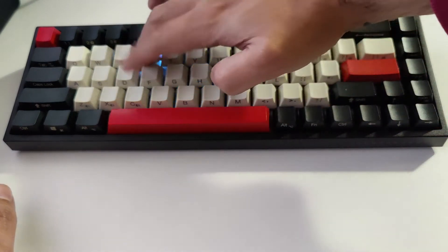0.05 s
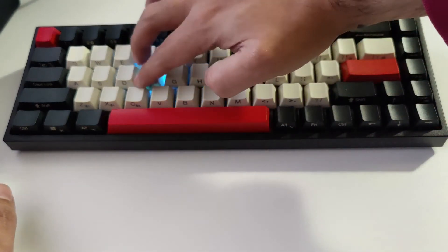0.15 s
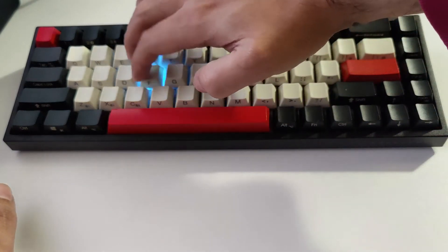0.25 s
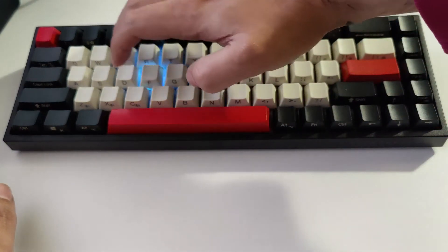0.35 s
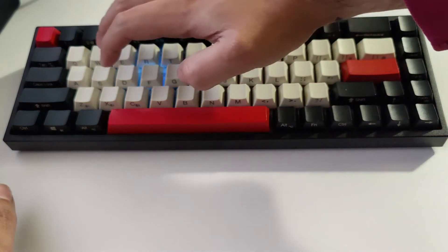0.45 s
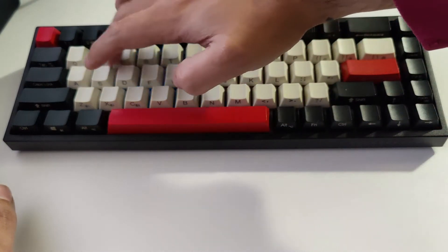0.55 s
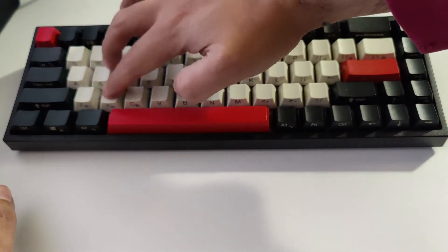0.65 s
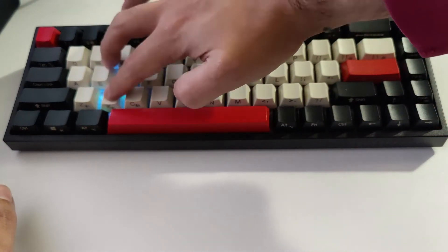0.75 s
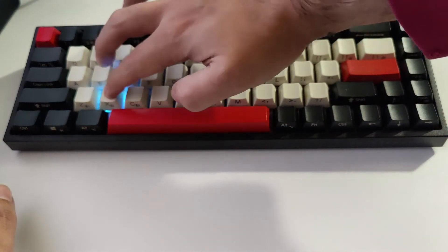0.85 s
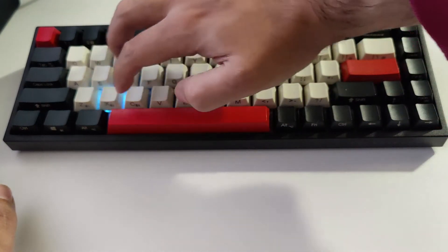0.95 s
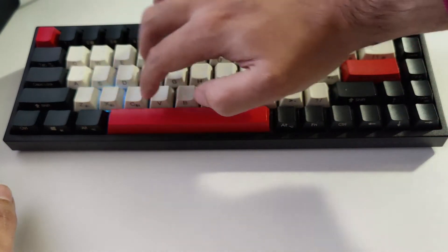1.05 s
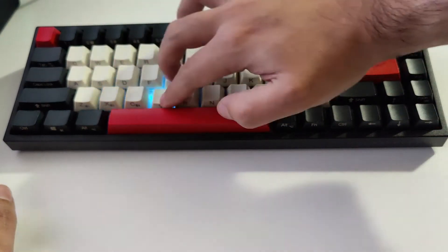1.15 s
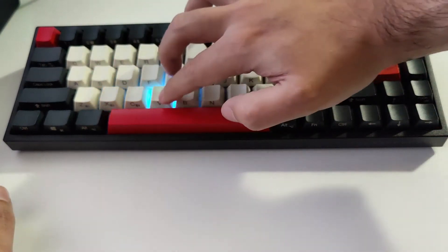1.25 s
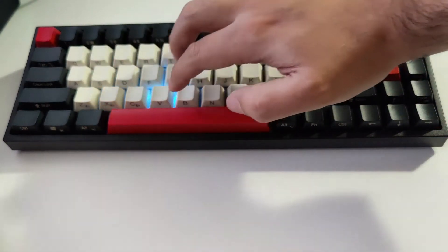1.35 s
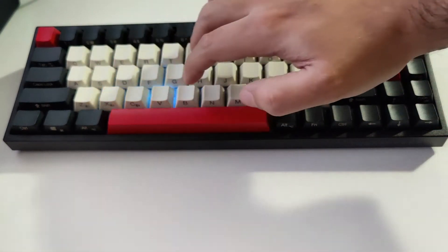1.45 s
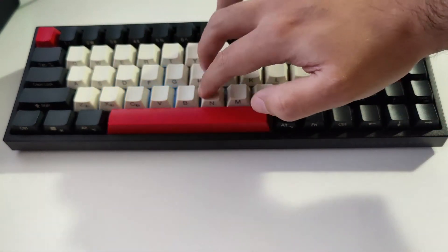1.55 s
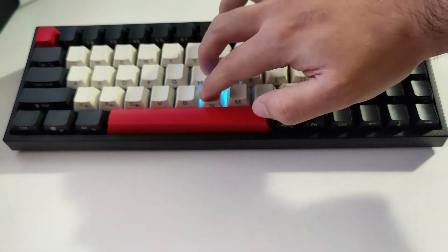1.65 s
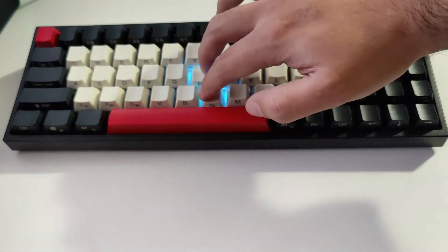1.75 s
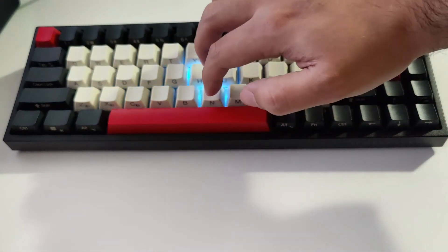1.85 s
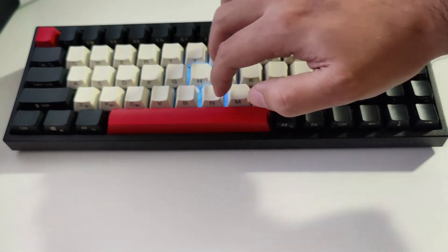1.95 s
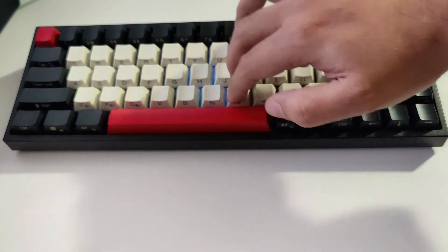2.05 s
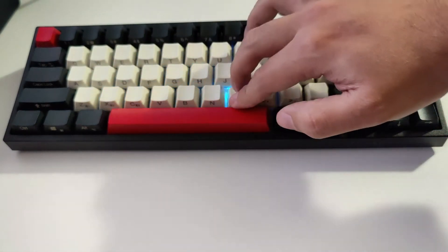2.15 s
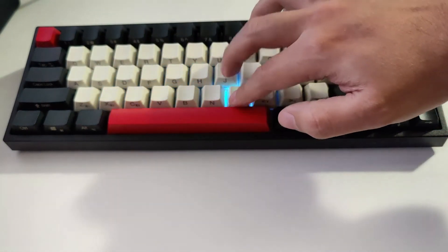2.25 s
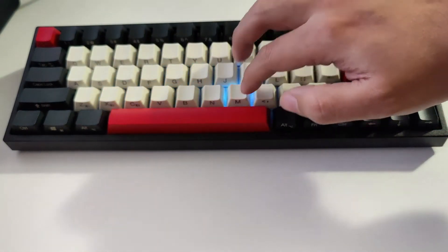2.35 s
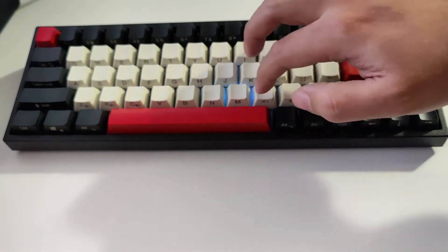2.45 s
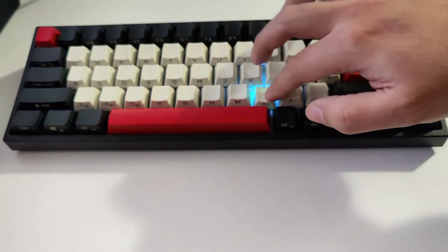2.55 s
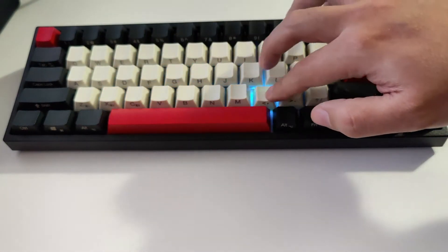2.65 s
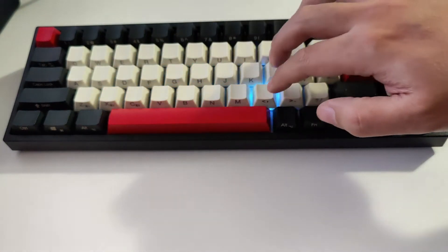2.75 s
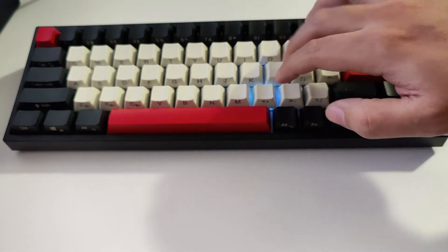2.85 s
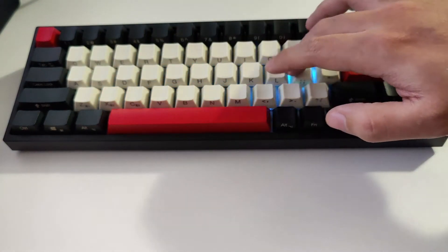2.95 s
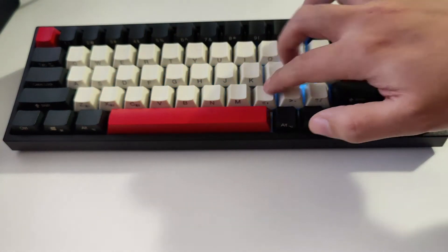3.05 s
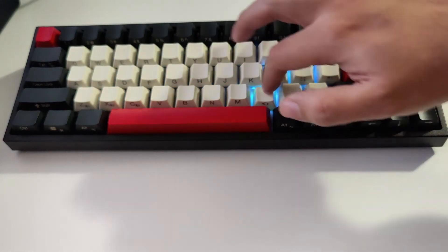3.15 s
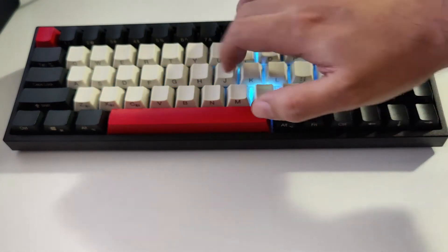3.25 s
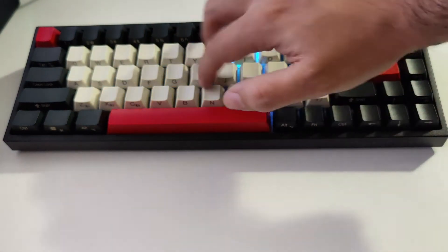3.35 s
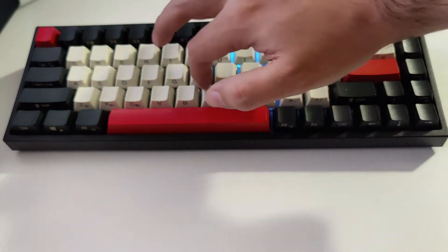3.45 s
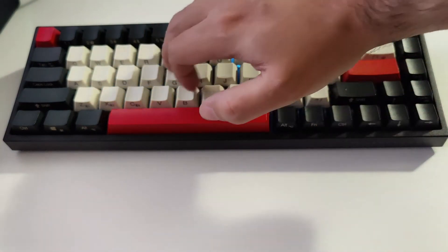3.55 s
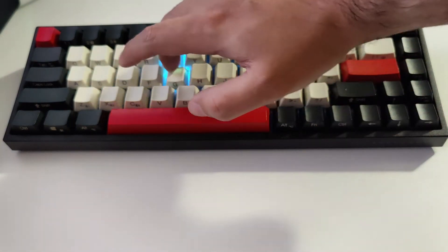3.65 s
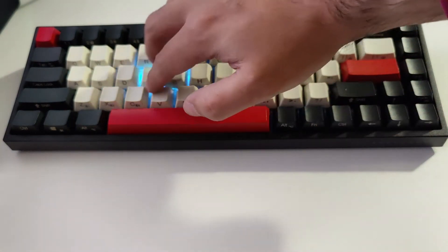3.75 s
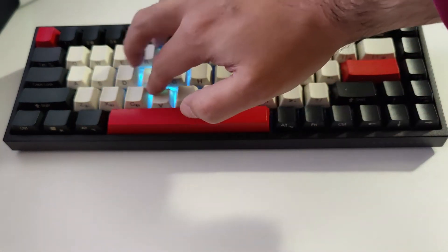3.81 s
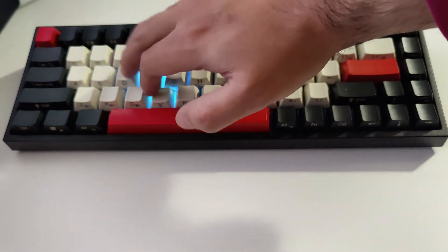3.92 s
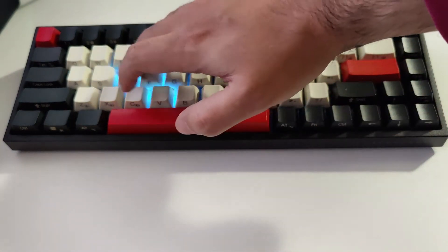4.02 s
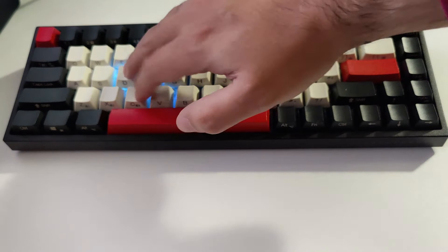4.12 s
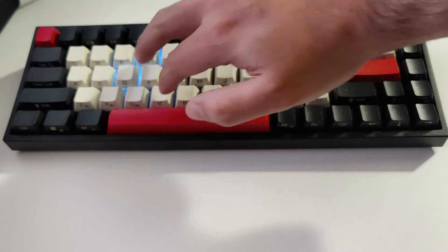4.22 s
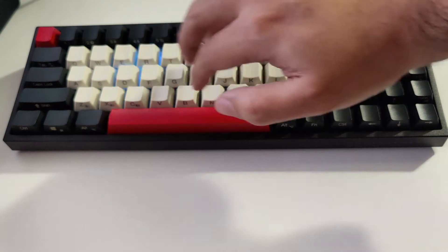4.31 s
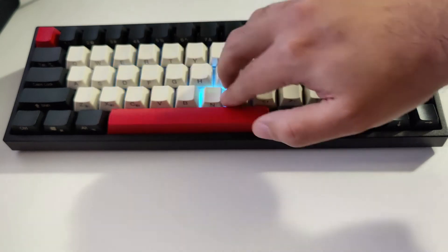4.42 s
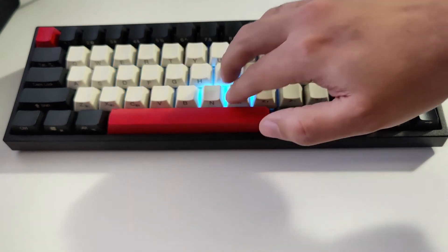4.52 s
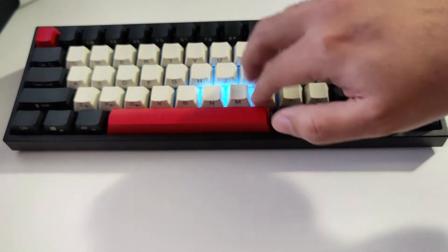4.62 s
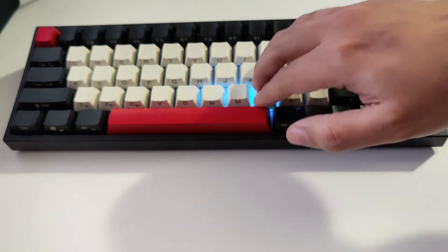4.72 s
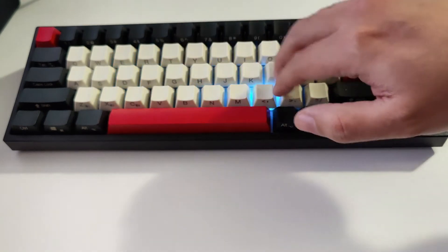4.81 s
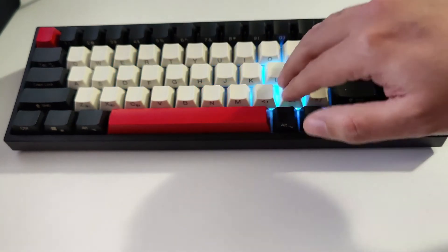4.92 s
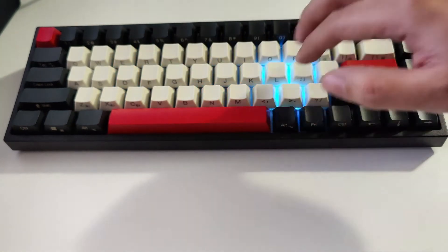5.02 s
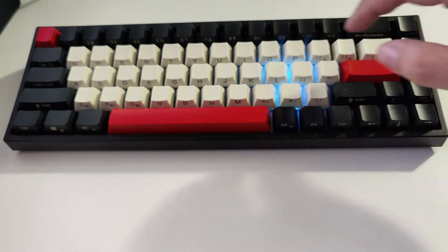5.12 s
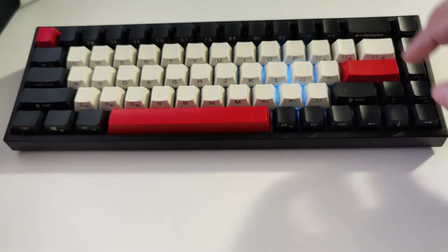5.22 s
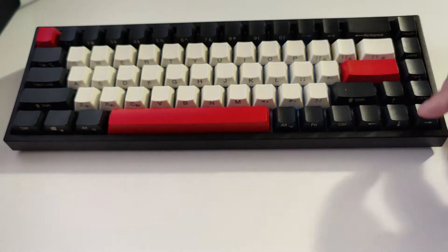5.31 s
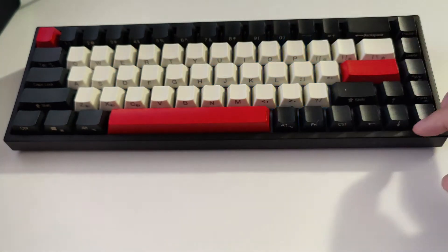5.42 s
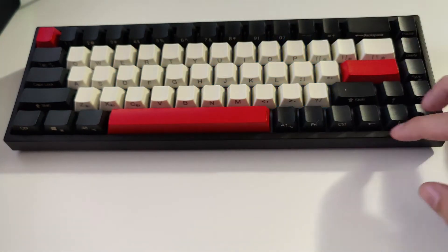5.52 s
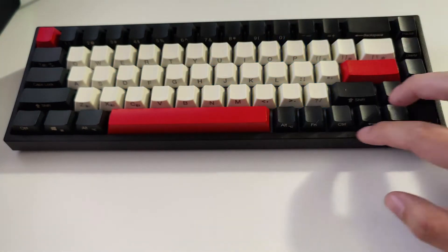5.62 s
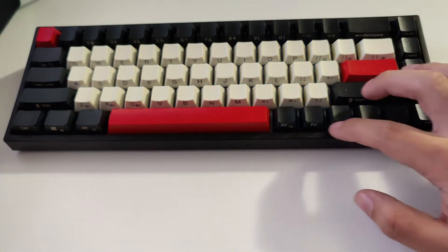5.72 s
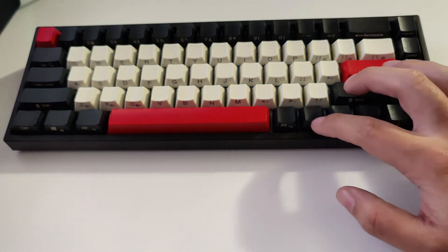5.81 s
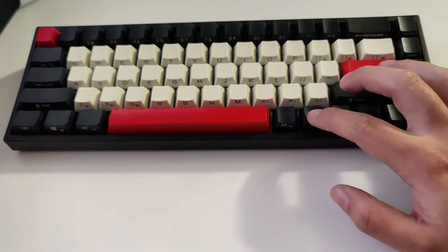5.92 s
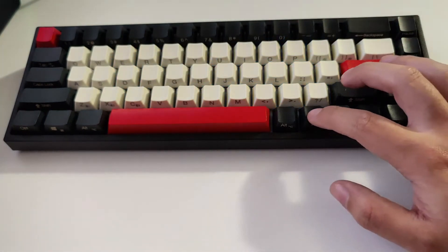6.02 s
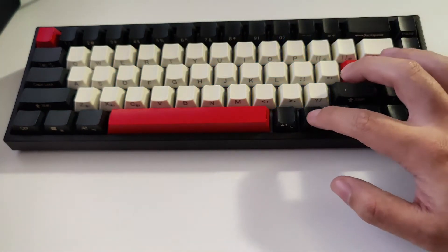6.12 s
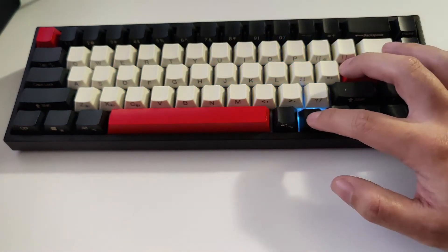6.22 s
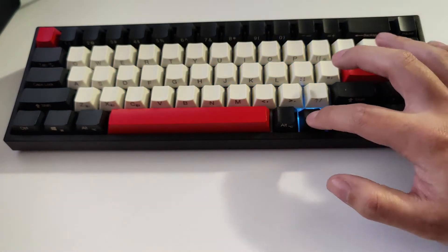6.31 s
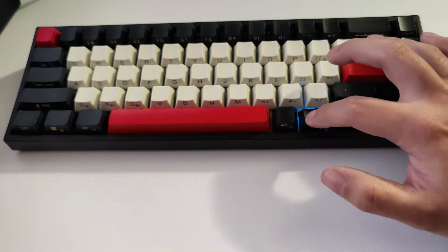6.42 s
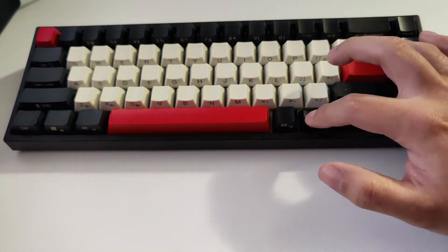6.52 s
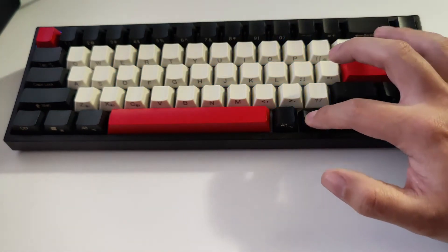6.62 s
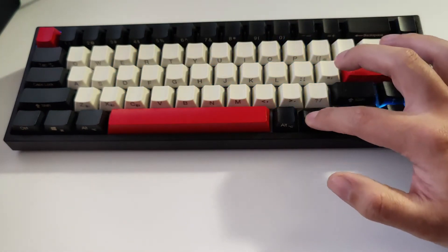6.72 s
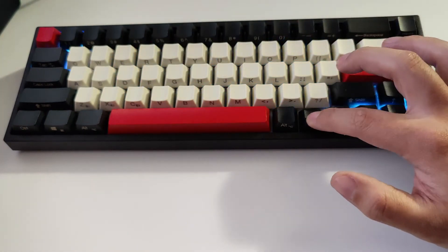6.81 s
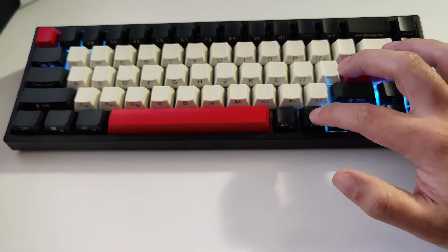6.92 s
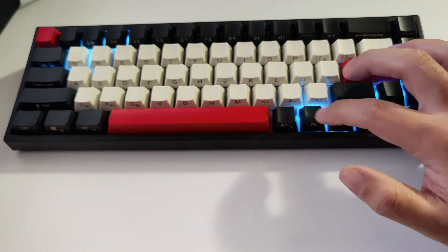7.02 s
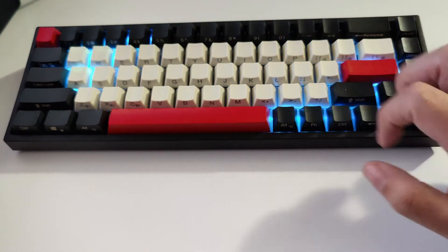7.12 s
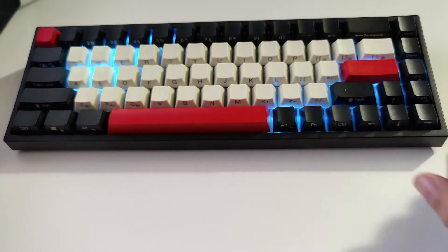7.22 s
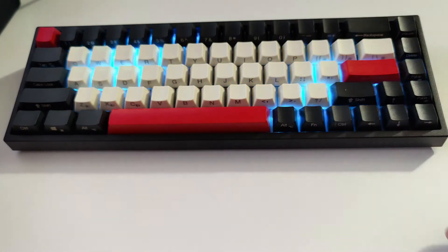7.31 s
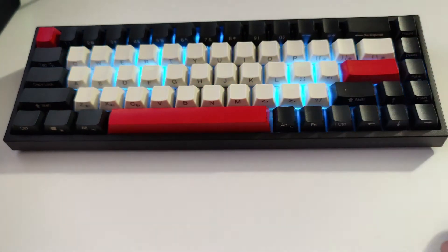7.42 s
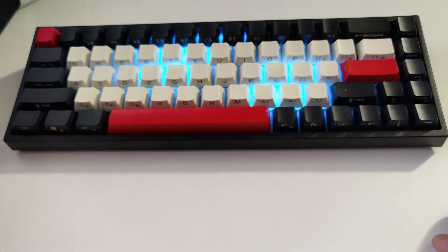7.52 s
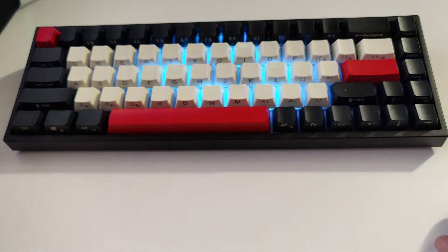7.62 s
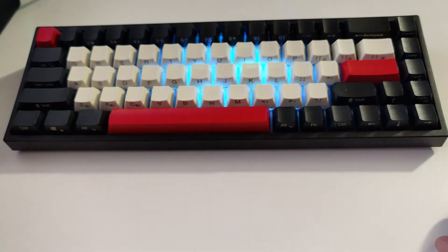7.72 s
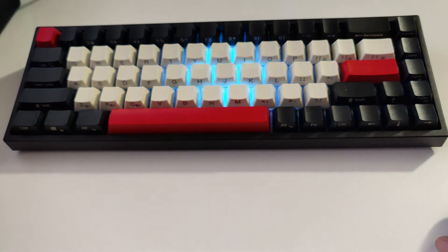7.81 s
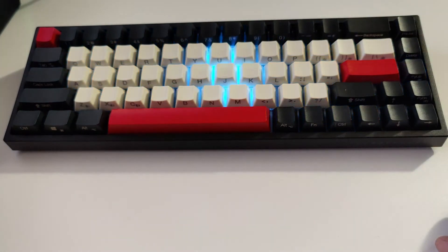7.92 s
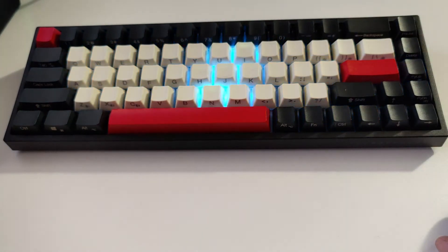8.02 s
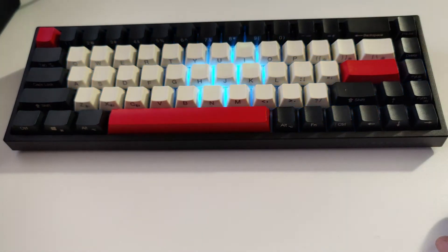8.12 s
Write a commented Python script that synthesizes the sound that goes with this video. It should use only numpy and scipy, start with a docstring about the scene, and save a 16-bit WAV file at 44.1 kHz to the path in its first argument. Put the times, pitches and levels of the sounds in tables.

```python
"""Under steady room air and a faint, swelling fan hum, a hand taps a clicky keyboard on a desk.
Strokes are made of finger touches, switch snaps, bottom hits, some resets, and springing back.
Struck plastic modes make the keys, low damped modes the thumps of the desk, filtered noise the rubs.
The hand starts at the left, goes to the middle and back, then ends a little right of the middle.
At five seconds a hard release leaves a spring pinging; late strokes are sparse; an arm drags off the desk."""
import sys
import numpy as np
from scipy import signal
from scipy.fft import rfft, irfft
from scipy.io import wavfile
from scipy.ndimage import uniform_filter1d, map_coordinates

SR = 44100
rng = np.random.default_rng(int(sys.argv[2]) if len(sys.argv) > 2 else 0)


def wav_out(sig):
    """Save sig, one row per channel (or a flat mono array), as 16-bit PCM at SR to the path in sys.argv[1]."""
    wavfile.write(sys.argv[1], SR, np.round(np.clip(np.atleast_2d(sig).T, -1, 1) * 32767).astype(np.int16))


N = 359856  # samples

# a finger lands on a cap or nudges a neighbour: [t/s, blow level/dB, keycap over case/dB]
TOUCHES = [(.089, -43.5, 7), (0.1956, -24.5, -2.5), (0.6822, -35.5, 1.5), (.771, -30.5, 6),
           (1.2128, -25, 12), (1.226, -30, -20), (1.312, -38.5, 10), (1.666, -34.5, 1), (1.809, -34, 3.5),
           (2.165, -36, -2), (2.177, -36.5, -5.5), (2.3195, -39.5, -2.5), (2.645, -29, 2),
           (2.992, -24.5, -3.5), (3.1433, -37.5, -5), (3.4316, -41.5, -4), (3.598, -35, 0),
           (3.6373, -29.5, 1), (3.6725, -37, -7), (3.8401, -26, 0.5), (4.01, -20.5, 3.5),
           (4.5017, -29, -13), (4.5076, -29.5, 2), (4.74, -27.5, 4), (4.82, -32, 0.5),
           (4.9493, -36.5, -4.5), (5.886, -37, -1.5), (6.037, -46.5, -13), (6.5, -39.5, 8.5),
           (6.55, -46, 12), (7.0778, -42, -12)]
# the key hits bottom and the finger's weight reaches the desk:
# [t/s, blow level/dB, desk thump/dB, boom of the hollow case/dB]
BOTTOMS = [(0.129, -24, -54.5, -69), (0.23, -26, -64, -73), (0.806, -23, -47, -48),
           (1.253, -23, -55.5, -63), (1.746, -23.5, -49.5, -50), (2.217, -26, -52.5, -52.5),
           (2.664, -22.5, -44.5, -44), (3.013, -27, -75, -78), (3.195, -28, -74, -61),
           (3.342, -23.5, -50.5, -56), (3.475, -20.5, -48.5, -45.5), (3.69, -16, -45, -37),
           (3.883, -19.5, -54, -47), (4.062, -23, -62.5, -58), (4.557, -25, -54.5, -49),
           (4.765, -20, -41.5, -50), (4.97, -21.5, -37, -53.5), (6.3, -31, -61.5, -76),
           (6.586, -26.5, -57.5, -68)]
# the spring throws the key back against its top stop:
# [t/s, blow level/dB, keycap over case/dB, contact tick/dB]
RELEASES = [(0.3157, -30.5, -2.5, -45), (.3603, -24, 6.5, -31), (0.8825, -26.5, -3, -43.5),
            (0.9806, -25, -4, -34), (0.9846, -30, 0, -37), (1.3645, -34.5, 7, -30.5),
            (1.368, -28.5, 1, -41), (1.9073, -23, 4.5, -29.5), (1.917, -23, -3.5, -29),
            (2.4118, -29.5, -0.5, -29), (2.806, -30, -1, -39.5), (3.163, -26.5, -0.5, -33),
            (3.3202, -29.5, 17, -35), (3.3271, -30, -1.5, -43), (3.453, -23.5, -5, -32),
            (4.0772, -24, -0.5, -30), (4.2184, -30, 0, -38), (4.2428, -30.5, 7, -39.5),
            (4.249, -28, -2.5, -40.5), (4.2727, -30.5, -2, -46), (4.595, -26, -3, -36),
            (4.6347, -24, 1, -33.5), (4.8573, -24.5, 1, -36), (5.033, -25.5, -3, -36),
            (5.0415, -13, 4.5, -23), (6.683, -24, 3, -28), (7.0119, -31, -13, -50.5)]


def snaps(click_db=-8.5, cap_db=-40.0, case_db=-47.0, split=0.0043, slide_db=-40.5):
    """Sudden release of stored strain: the click piece gives a bright burst and a close pair of high modes."""
    # half way down the click piece snaps:
    # [t/s, level before click_db/dB, ring f/Hz, ring over burst/dB, left over right/dB]
    snap_events = [(.1163, -17.5, 12960, 5.5, 1.5), (.203, -7, 11390, 7.5, 4),
                   (0.7829, -12, 11550, -6.5, 2), (1.241, -16, 11560, 4.5, 0),
                   (1.7345, -9.5, 11500, 4.5, 3), (1.7707, -11, 11420, 3, 0),
                   (2.2043, -10, 11860, 2.5, 4.5), (2.656, -13, 9870, -10, 1.5),
                   (2.998, -9, 11150, 11.5, -0.5), (3.18, -13.5, 10140, 1, 1),
                   (3.3469, -16.5, 10940, -11, 0), (3.6863, -13, 11700, 0, 2),
                   (3.8544, -10.5, 11460, 2.5, 2), (3.89, -10.5, 11900, -4, .5),
                   (4.0478, -17, 12750, 0, 2.5), (4.0667, -14, 11040, 5.5, 4), (4.526, -13, 11530, 3, 1.5),
                   (4.535, -12.5, 11840, 5, 2), (4.7569, -16, 9700, 4, 0.5), (4.964, -16, 11600, 1, 4),
                   (4.97, -7.5, 11520, 7, -1), (4.9773, -14.5, 11140, 0, 6.5),
                   (6.2832, -10, 10080, 5, -0.5), (6.5704, -9.5, 7330, 11, -3)]
    # mode strength of the burst: [f/Hz, level/dB]
    burst_spectrum = [(5200, -11), (7000, -5), (8500, -3.5), (9700, 2), (11500, -6.5), (12700, -8),
                      (14000, -2), (16300, -10)]
    out = np.zeros((2, N))
    for s, db, hz, ring_db, pan_db in snap_events:
        burst = plastic(burst_spectrum, t60=0.014, rise_s=0.00012, disorder=1.7, count=70)
        pair_hz = hz * np.array([1, 1 - split])
        tone = ring(pair_hz, np.array([1, .5]), t60=0.012, rise_s=0.00016, disorder=0.35)
        click = (burst + amp(ring_db) * tone) / np.hypot(1, amp(ring_db))
        add(out, s, amp(db + click_db) * click + clatter(case_db, cap_db), pan_db)
        slide(out, s, burst, db + slide_db)
    return out


def knocks(chatter_db=-8.5, slide_db=-11.0, first_touch_db=-3.5, stroke_s=0.054):
    """Impact: cap and stem strike their stops with a hard tick, a clatter and a weaker rebound of the cap."""
    # mode strength of the contact tick: [f/Hz, level/dB]
    tick_spectrum = [(5200, -8), (7200, 1), (8500, -1.5), (10000, -1.5), (11500, 4.5), (12600, -5),
                     (14000, -5), (16300, -10.5)]
    out = np.zeros((2, N))
    rows = blows()
    for s, case_db, cap_db, tick_db in rows:
        tick = plastic(tick_spectrum, t60=0.018, rise_s=0.0003, disorder=2.4, count=70)
        blow = clatter(case_db, cap_db) + amp(tick_db) * tick
        add(out, s, blow, rng.normal(0.67, 1))
        rebound_s = s + rng.uniform(0.0011, 0.0036)
        add(out, rebound_s, amp(chatter_db) * clatter(case_db, cap_db))
        at_rest = not any(0 < s - row[0] < stroke_s for row in rows)
        slide(out, s, blow, slide_db + first_touch_db * at_rest)  # a key at rest rubs a little less
    return out


def blows():
    """Every impact of the strokes shares its level: rows of [t/s, case knock/dB, keycap clack/dB, tick/dB]."""
    # a slowly rising key resets its click piece ahead of the top stop: [t/s, blow level/dB]
    reset_events = [(0.309, -26), (0.3441, -24.5), (0.9627, -30.5), (1.3506, -29), (1.8911, -24.5),
                    (2.379, -43), (2.7851, -32), (3.3024, -29), (6.6702, -29), (6.9828, -31)]
    # what each part takes of a blow (dB relative to the blow level)
    touch_body_db, touch_tick_db, release_body_db = -9, -12.5, -8.5
    bottom_case_db, bottom_cap_db, bottom_tick_db = -14.5, -11, -14.5
    reset_case_db, reset_cap_db, reset_tick_db = -28.5, -26, -12
    rows = []
    for s, db, cap_over_db in TOUCHES:
        rows.append((s, *shared(db + touch_body_db, cap_over_db), tick_of(db) + touch_tick_db))
    for s, db, _, _ in BOTTOMS:
        rows.append((s, db + bottom_case_db, db + bottom_cap_db, tick_of(db) + bottom_tick_db))
    for s, db in reset_events:
        rows.append((s, db + reset_case_db, db + reset_cap_db, db + reset_tick_db))
    for s, db, cap_over_db, tick_db in RELEASES:
        rows.append((s, *shared(db + release_body_db, cap_over_db), tick_db))
    return rows


def tick_of(db, usual_db=-25.5, brighten=.3):
    """Harder contact is brighter: the tick gains brighten dB more than the blow per dB."""
    return db + brighten * (db - usual_db)


def shared(db, cap_over_db):
    """Power division: splits the level of a blow into (case dB, keycap dB)."""
    case_db = db - 20 * np.log10(np.hypot(1, amp(cap_over_db)))
    return case_db, case_db + cap_over_db


def clatter(case_db, cap_db):
    """Superposition of two struck bodies: the case knocks and the hollow keycap clacks."""
    # strength of the crowded plastic modes of each part: [f/Hz, level/dB]
    case_spectrum = [(400, -4.5), (620, -25.5), (810, -2.5), (1100, 2), (1350, 1), (1650, -3.5), (2100, -7)]
    cap_spectrum = [(2100, -9), (2500, -1), (3050, -0.5), (3600, -3.5), (4200, -8.5), (5200, -10.5)]
    case = plastic(case_spectrum, t60=0.03, rise_s=.0005, disorder=1.91, count=16)
    cap = plastic(cap_spectrum, t60=0.021, rise_s=.0003, disorder=1.6, count=26)
    return amp(case_db) * case + amp(cap_db) * cap


def plastic(spectrum, t60, rise_s, disorder, count, spread_db=4.0):
    """High modal density: a plastic part rings with count modes, placed anew for every blow."""
    low_hz, high_hz = spectrum[0][0], spectrum[-1][0]
    hz = low_hz + (high_hz - low_hz) * (np.arange(count) + rng.random(count)) / count
    gains = amp(read(spectrum, hz) + spread_db * rng.standard_normal(count))
    return ring(hz, gains, t60, rise_s, disorder)


def ring(hz, gains, t60, rise_s, disorder, scatter_hz=11000, port_lag_s=.00003, size=2048, count=176):
    """Modal synthesis: damped struck modes at two microphone ports, rms 1 over the first count samples."""
    t = np.arange(size) / SR
    # the modes start partly in step, which gives the first crack
    phase = disorder * rng.standard_normal(len(hz)) - 2 * np.pi * hz * 2 * rise_s
    # short waves leave a key in lobes, so the ports hear them out of step
    lag = 2 * np.pi * hz * port_lag_s * rng.standard_normal()
    skew = lag + np.minimum(hz / scatter_hz, 1) * rng.standard_normal(len(hz))
    weights = gains * np.exp(1j * np.array([phase + skew / 2, phase - skew / 2]))
    # each mode goes to its nearest Fourier line
    lines = np.zeros((2, size), complex)
    np.add.at(lines, (slice(None), np.round(hz * size / SR).astype(int) % size), weights)
    envelope = amp(-60 * t / t60) * (1 - np.exp(-(t / rise_s) ** 2))
    sound = np.fft.ifft(lines).real * envelope
    return sound / np.sqrt(np.mean(sound[:, :count] ** 2))


def slide(out, s, sound, db, swell_s=0.0055, share=0.019, size=1100):
    """Stick-slip friction: the stem rubs in its guide, and ever stronger tiny slips ring the same key."""
    slips = rng.standard_normal(size) * (rng.random(size) < share)
    before_stop_s = (np.arange(size) - size) / SR
    slips *= np.exp(before_stop_s / (swell_s * rng.uniform(0.32, 2)))
    slips *= amp(db) / np.linalg.norm(slips)
    add(out, s - size / SR, signal.fftconvolve(sound, slips[None], axes=1))


def spring(s=5.042, hz=1840, db=-49.0, t60=0.36):
    """Free damped oscillation: the hardest release leaves a switch spring pinging as one decaying sine."""
    out, t = np.zeros((2, N)), np.arange(SR) / SR
    add(out, s, amp(db - 60 * t / t60) * np.sin(2 * np.pi * hz * t))
    return out


def rubs(grain_db=1.0, size=200):
    """Friction noise: skin drags over the caps, catching unevenly."""
    # a fingertip slides over the caps: [t/s, length/s, level/dB]
    rub_events = [(0.035, 0.13, -58.5), (2.288, 0.13, -55), (3.536, 0.19, -52), (5.838, 0.15, -58)]
    # colour of the friction: [f/Hz, level/dB]
    rub_spectrum = [(600, -8), (900, -4), (1300, -4.5), (1650, 0), (2100, -9.5), (3200, -8), (5000, -25.5),
                    (15000, -21.5)]
    stroke = np.zeros((2, N))
    for s, length_s, db in rub_events:
        add(stroke, s, amp(db) * np.hanning(round(length_s * SR)))
    catch = amp(grain_db * unit(uniform_filter1d(rng.standard_normal(N), size)))
    return stroke * unit(catch) * noise(lambda f: amp(read(rub_spectrum, f)))


def desk(rise_s=0.0033, spread_db=5.0, tilt_db=6., even_place=0.22, size=16000, count=900):
    """Driving-point excitation: pushes rock the keyboard on the desk and boom in its case, by key place."""
    # the keyboard on its feet and the desk top: [f/Hz, level/dB, t60/s]
    desk_modes = [(60, 0, .22), (86.6, -6, 0.31), (109, -6, 0.28), (136, -3, 0.41), (186.8, 0.5, 0.29),
                  (239.3, -9.5, 0.41)]
    # mode strength of the hollow case: [f/Hz, level/dB]
    hollow_spectrum = [(240, -7), (320, -7.5), (400, 5), (490, 2), (550, -8)]
    out, t = np.zeros((2, N)), np.arange(size) / SR
    hz, db, t60 = np.transpose(desk_modes)[:, :, None]
    for s, thump_db, boom_db in pushes():
        weight, skew = rng.standard_normal((2, len(desk_modes), 1))
        phase = 2 * np.pi * hz * t + 0.16 * np.array([skew, -skew])
        # keys on the left favour the higher modes
        lean_db = tilt_db * (place_of(s) - even_place) * np.log2(hz / hz.mean())
        envelope = amp(db + lean_db + spread_db * weight - 60 * t / t60)
        modes = envelope * np.sin(phase) * rng.choice([-1, 1], hz.shape)
        thump = modes.sum(1) * (1 - np.exp(-t / rise_s))
        add(out, s, amp(thump_db) * thump / np.sqrt(np.mean(thump[:, :count] ** 2)))
        boom = plastic(hollow_spectrum, t60=.055, rise_s=0.0017, disorder=0.72, count=6)
        add(out, s, amp(boom_db) * boom)
    return out


def pushes(touch_desk_db=-27.5, release_desk_db=-29.5, light_boom_db=-36.5):
    """Transmitted force: bottoming has its own levels, touches and releases a share: [t/s, thump/dB, boom/dB]."""
    rows = [(s, thump_db, boom_db) for s, _, thump_db, boom_db in BOTTOMS]
    rows += [(s, db + touch_desk_db, db + light_boom_db) for s, db, _ in TOUCHES]
    return rows + [(s, db + release_desk_db, db + light_boom_db) for s, db, _, _ in RELEASES]


def sways(sway_hz=31, upper_hz=58, upper_db=-1.0, t60=.7, rise_s=0.0061):
    """Low-order modes: the whole desk rocks in two, each time 2 to 10 % below the nominal frequencies."""
    # the hand leans on or leaves the board and the desk sways: [t/s, level/dB]
    sway_events = [(3.641, -45.5), (2.66, -67), (4.77, -50.5), (6.692, -55.5), (6.921, -51), (7.079, -53.5),
                   (7.27, -53), (7.455, -44)]
    out, t = np.zeros((2, N)), np.arange(SR) / SR
    for s, db in sway_events:
        turns = 2 * np.pi * t * rng.uniform(.9, 0.98)
        modes = np.sin(sway_hz * turns) + amp(upper_db) * np.sin(upper_hz * turns)
        add(out, s, amp(db - 60 * t / t60) * (1 - np.exp(-t / rise_s)) * modes)
    return out


def lift_off(s=7.44, db=-40.0, rise_s=.008, t60=0.31):
    """Broadband friction: the arm drags off the desk with a short, rough, low rumble."""
    # colour of the drag: [f/Hz, level/dB]
    drag_spectrum = [(40, 6), (130, 0), (250, -9), (450, -15), (650, -28), (3000, -45.5)]
    t = np.maximum(np.arange(N) / SR - s, 0)
    envelope = amp(db - 60 * t / t60) * (1 - np.exp(-t / rise_s))
    return envelope * noise(lambda f: amp(read(drag_spectrum, f)))


def ports(x, lead_s=.0001):
    """Inter-port time difference: sound reaches the nearer port first, by lead_s from an end of the board."""
    n = np.arange(N)
    lead = place_of(n / SR) * lead_s * SR / 2  # samples
    left = map_coordinates(x[0], [n + lead], order=5)
    right = map_coordinates(x[1], [n - lead], order=5)
    return np.array([left, right])


def place_of(s):
    """Linear kinematics: where the hand is on the board at time s."""
    # the path of the hand: [t/s, place from -1 at the right end to 1 at the left]
    hand_path = [(.8, 0.99), (1.8, 0.59), (2.9, 0.13), (4.1, 0.9), (5, 0), (6.5, -.3)]
    return np.interp(s, *np.transpose(hand_path))


def room(x, count=5):
    """Convolution reverberation: several random tails take turns, which keeps the reverberation smooth."""
    turn = np.arange(N) / SR * count  # all tails have had their turn after one second
    out = np.zeros((2, N))
    for k in range(count):
        away = abs((turn - k + count / 2) % count - count / 2)
        fade = np.cos(np.pi / 2 * np.minimum(away, 1))  # equal-power
        out += signal.oaconvolve(x * fade, reflections(), axes=1)[:, :N]
    return out


def reflections(wet_db=-8.5, echo_s=.0078, echo_db=-22.5, near_db=-2.5, size=16000):
    """Frequency-dependent decay: faint desk scatter, one clear echo off a near surface, a short dense tail."""
    # small room, reverberation time: [f/Hz, t60/s]
    room_decay = [(200, 0.6), (600, 0.1167), (1500, 0.2072), (3500, 0.23), (8000, 0.1867), (15000, 0.17)]
    # small room, colour: [f/Hz, level/dB]
    room_colour = [(200, 2.5), (600, 2), (1500, 0), (3500, -2.5), (8000, -6.5), (15000, -3.5)]
    t = np.arange(size) / SR
    taps = rng.standard_normal((2, size)) * np.where(t < echo_s, amp(near_db), 1)
    hz, at, z = signal.stft(taps, SR, nperseg=128)
    z = z * amp(read(room_colour, hz)[:, None] - 60 * at / read(room_decay, hz)[:, None])
    tail = signal.istft(z, SR, nperseg=128)[1][:, :size]
    tail *= 1 + np.exp(-abs(t - echo_s) / 0.0027)  # reflections around the echo are reinforced
    tail *= amp(wet_db) / np.linalg.norm(tail[0])
    tail[:, round(echo_s * SR)] += amp(echo_db)
    return tail


def background(air_db=-66, hum_db=1.5, swell_db=3.0):
    """Stationary noise and narrow-band resonance: room air, and the hum of a fan that swells and sinks."""
    # colour of the air: [f/Hz, relative spectral density level/dB]
    air_spectrum = [(20, -11), (45, -7), (90, -15), (170, -17), (230, -12), (320, -19), (520, -25),
                    (950, -29), (1400, -28.5), (2200, -32.5), (5300, -43), (7000, -38), (14000, -37),
                    (16000, -44)]
    # fan hum: [f/Hz, half width at half amplitude/Hz, level before hum_db and swell/dB]
    hum_bands = [(219.4, 13, -68), (396, 14, -78.5), (854, 4.4, -82.5)]
    air = amp(air_db) * noise(lambda f: amp(read(air_spectrum, f)))
    hum = np.zeros((2, N))
    for hz, width, db in hum_bands:
        hum += amp(db) * noise(lambda f: 1 / (1 + ((f - hz) / width) ** 2))
    swell = noise(lambda f: np.exp(-(f / 2) ** 2))[0]  # slower than a few Hz
    return air + amp(hum_db + swell_db * swell) * hum


def noise(gain):
    """Spatial coherence: stereo noise of rms 1 with the spectrum gain(Hz), nearly mono in the bass."""
    # left-right likeness: [f/Hz, coherence from 0 to 1]
    likeness = [(50, 1), (300, 0.75), (1000, 0.41), (3000, 0.16), (15000, 0.085)]
    hz = np.fft.rfftfreq(N, 1 / SR)
    a, b = rfft(rng.standard_normal((2, N)))
    same = np.clip(read(likeness, hz), 0, 1)
    pair = np.array([a, same * a + np.sqrt(1 - same ** 2) * b])
    return unit(irfft(pair * gain(hz), N))


def amp(db):
    """Logarithmic level: decibels to amplitude gain."""
    return 10 ** (np.asarray(db) / 20)


def unit(x):
    """Root-mean-square normalization: scales to rms 1."""
    return x / np.sqrt(np.mean(x ** 2) + 1e-20)


def read(points, hz):
    """Logarithmic frequency scale: joins (Hz, value) points by straight lines on it."""
    f, value = np.transpose(points)
    return np.interp(np.log(hz + 1), np.log(f + 1), value)


def add(mix, s, sound, pan_db=0):
    """Linear superposition: mixes a sound in at time s, leaning left for positive pan_db."""
    part = mix[:, max(round(s * SR), 0):][:, :sound.shape[-1]]
    lean = amp([[pan_db / 2], [-pan_db / 2]])
    part += (unit(lean) * sound)[:, :part.shape[1]]


def scene():
    """Direct plus reverberant field: the keys with their room, then the desk and the background."""
    keys = ports(snaps() + knocks() + rubs() + spring())
    return keys + room(keys) + desk() + sways() + lift_off() + background()


def record(dry, edge_hz=16200):
    """Band limitation: a linear-phase low-pass filter removes the top of the treble."""
    lowpass = signal.firwin(201, edge_hz, window=("kaiser", 9), fs=SR)
    return signal.oaconvolve(dry, lowpass[None], "same")


dry = scene()
out = record(dry)
wav_out(out)
```